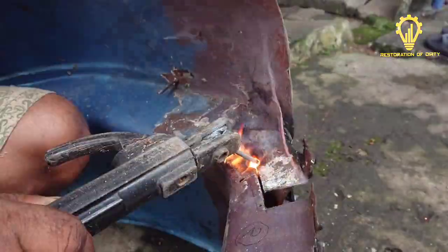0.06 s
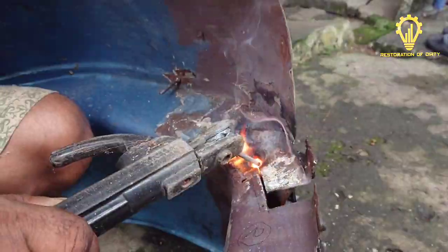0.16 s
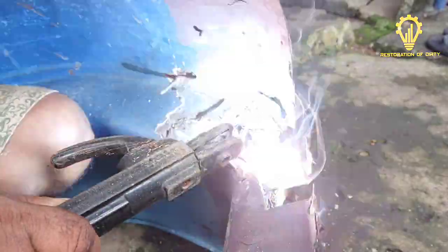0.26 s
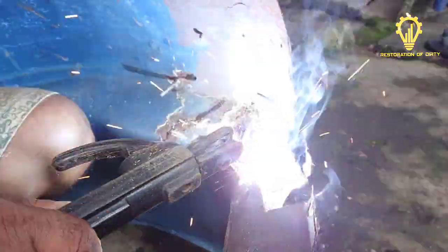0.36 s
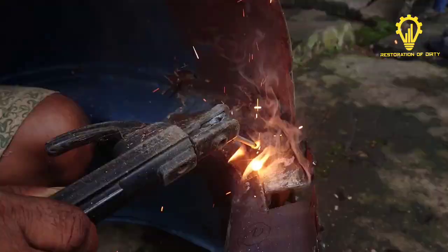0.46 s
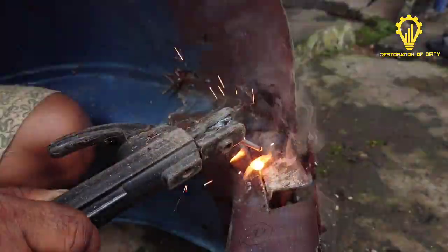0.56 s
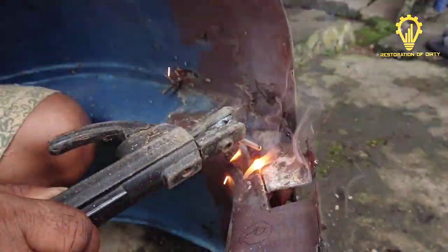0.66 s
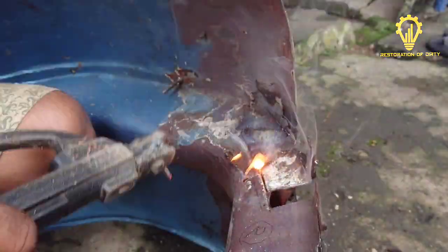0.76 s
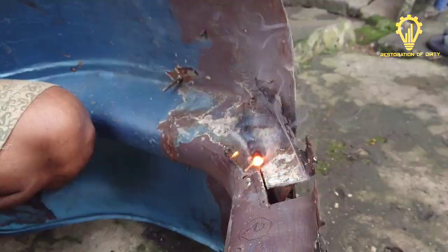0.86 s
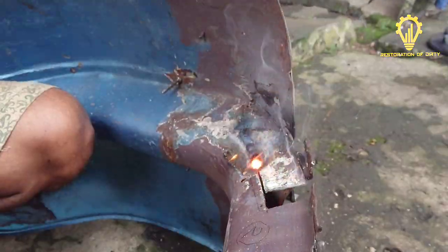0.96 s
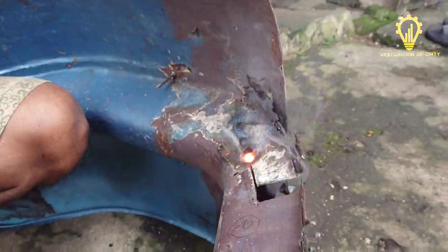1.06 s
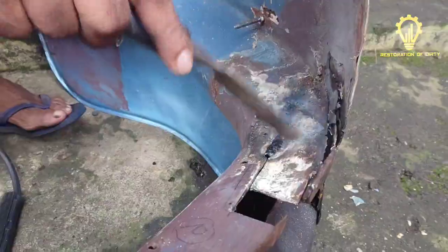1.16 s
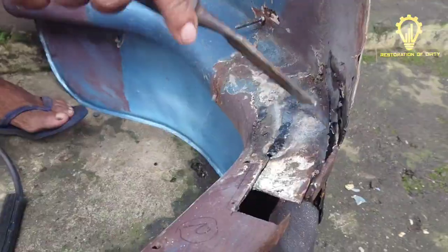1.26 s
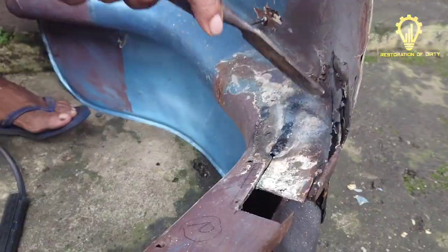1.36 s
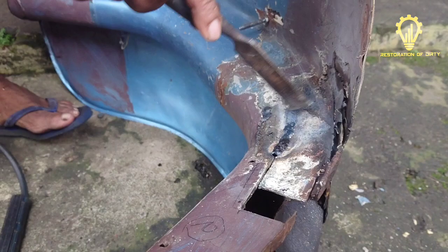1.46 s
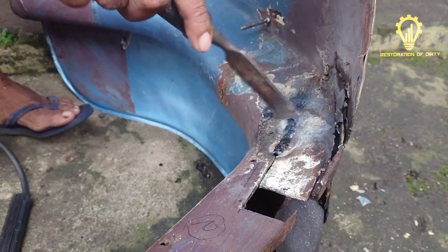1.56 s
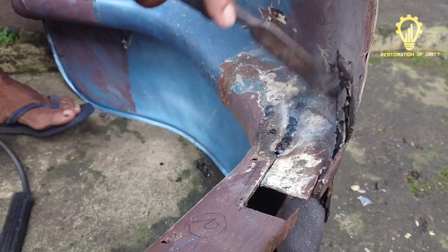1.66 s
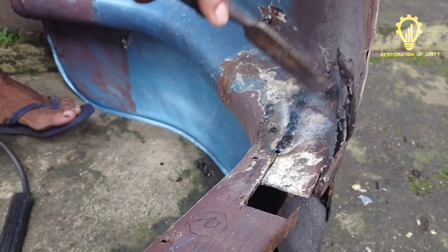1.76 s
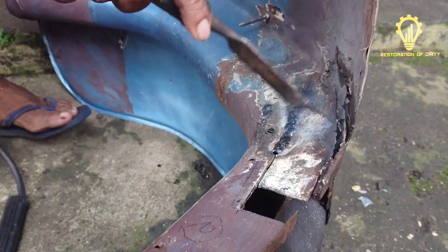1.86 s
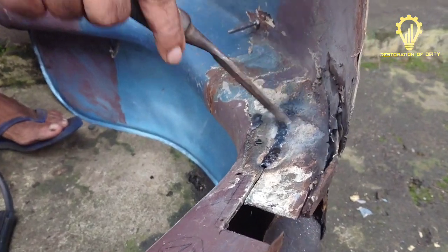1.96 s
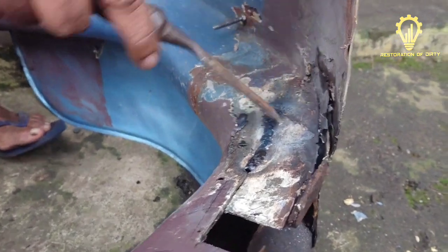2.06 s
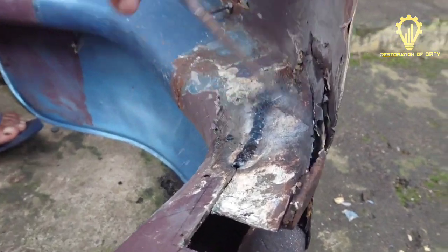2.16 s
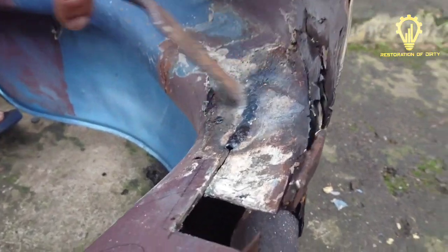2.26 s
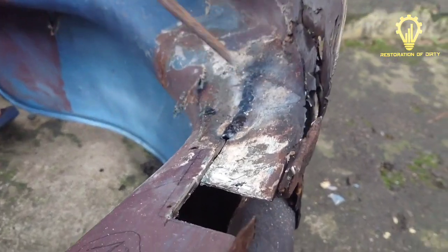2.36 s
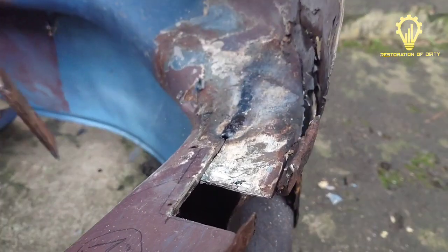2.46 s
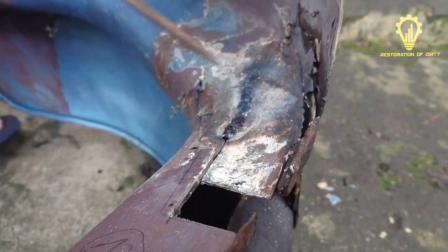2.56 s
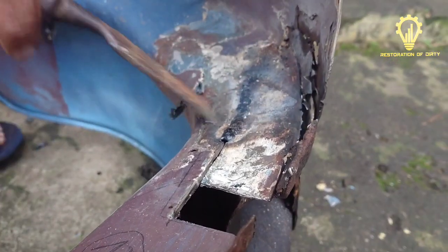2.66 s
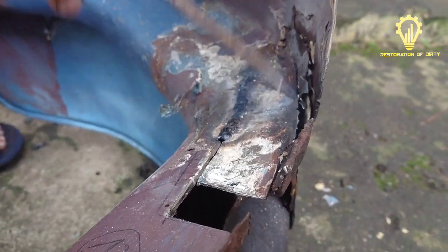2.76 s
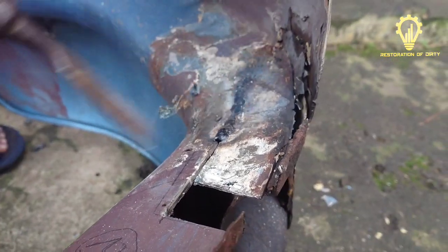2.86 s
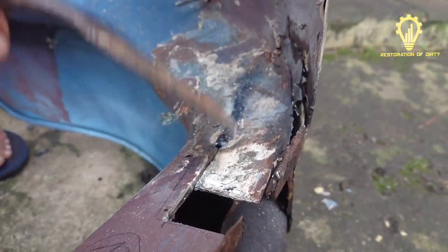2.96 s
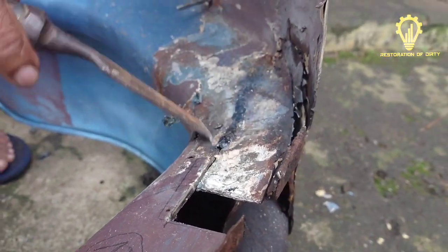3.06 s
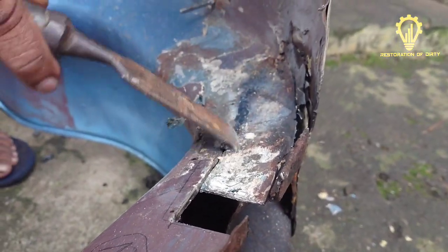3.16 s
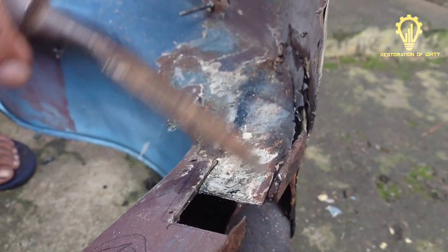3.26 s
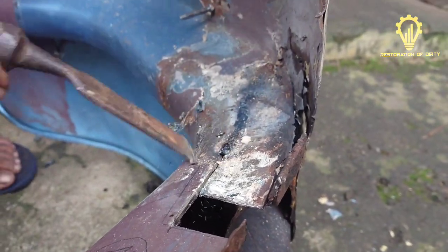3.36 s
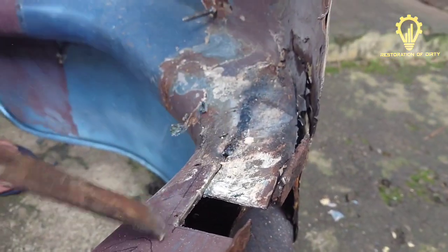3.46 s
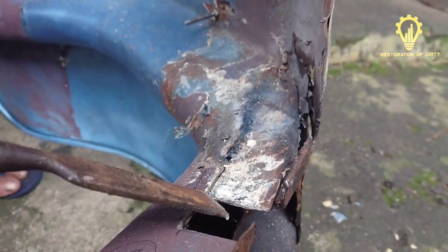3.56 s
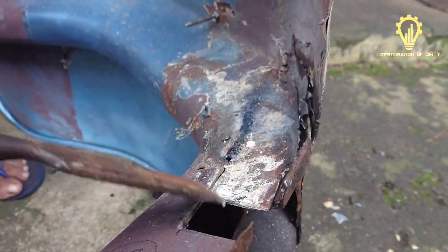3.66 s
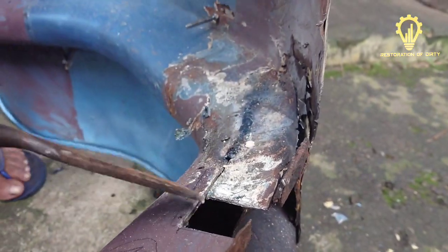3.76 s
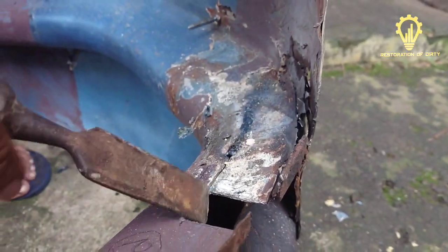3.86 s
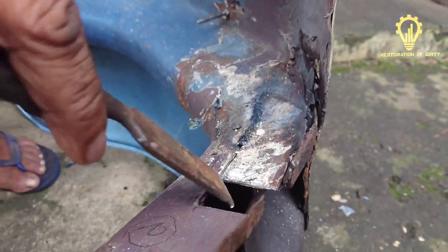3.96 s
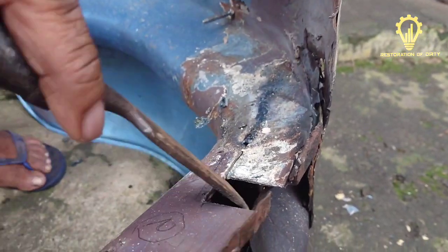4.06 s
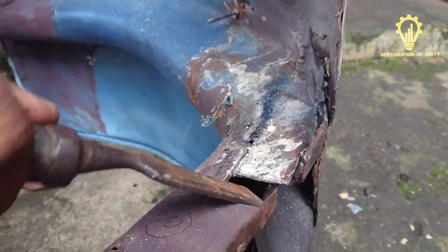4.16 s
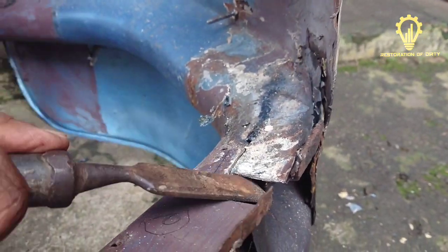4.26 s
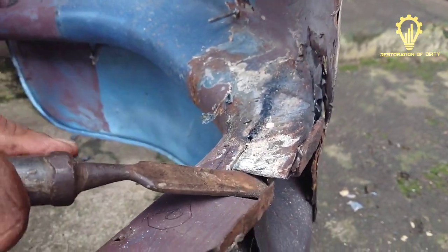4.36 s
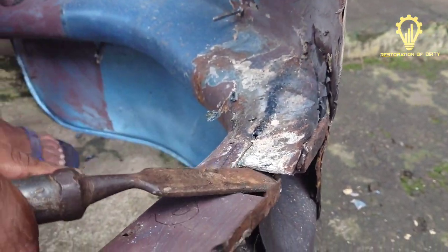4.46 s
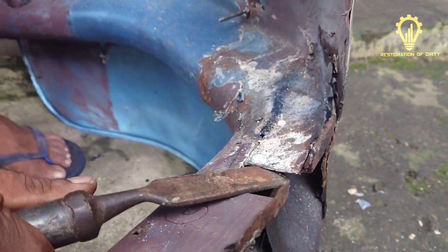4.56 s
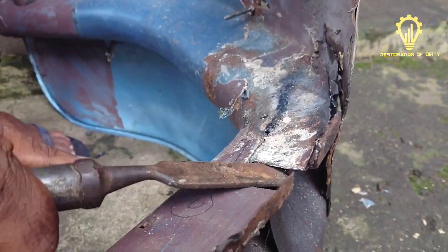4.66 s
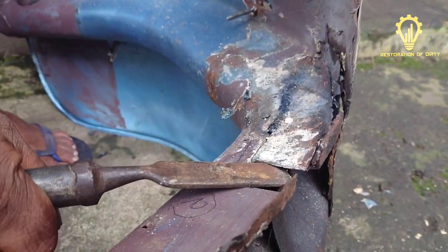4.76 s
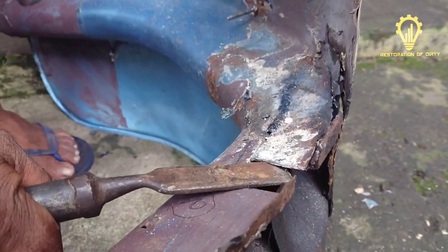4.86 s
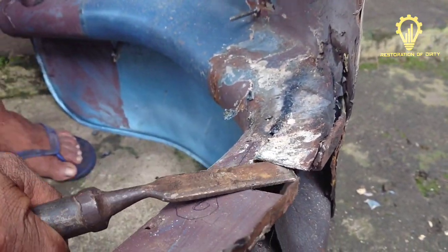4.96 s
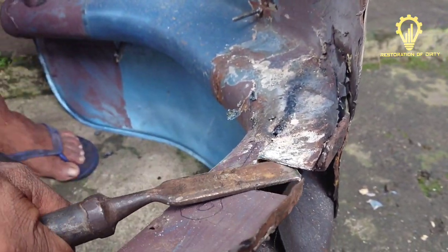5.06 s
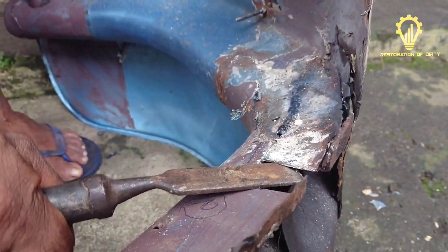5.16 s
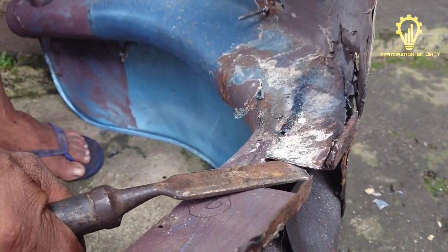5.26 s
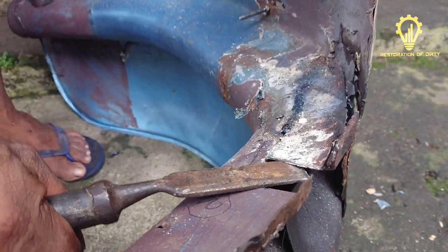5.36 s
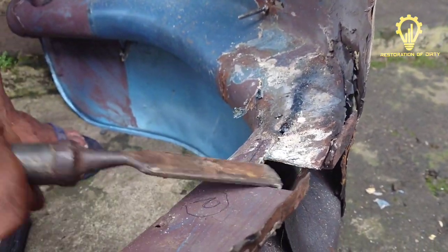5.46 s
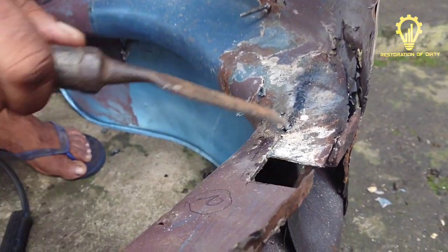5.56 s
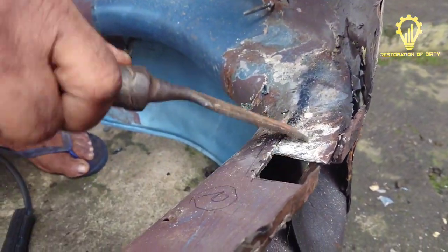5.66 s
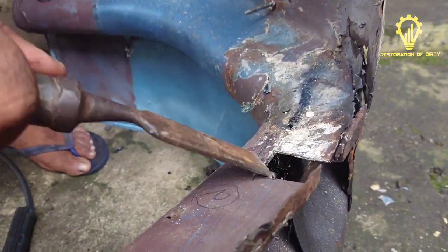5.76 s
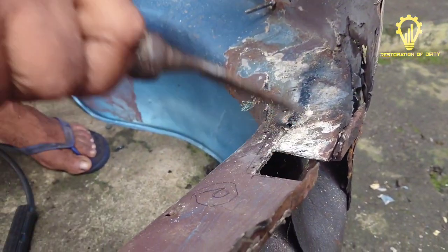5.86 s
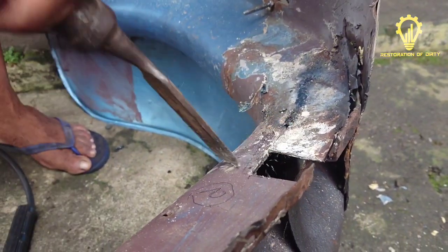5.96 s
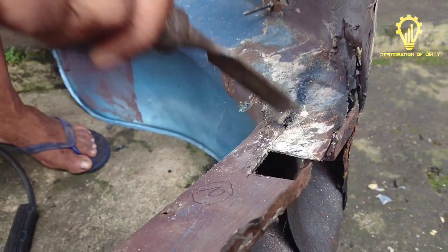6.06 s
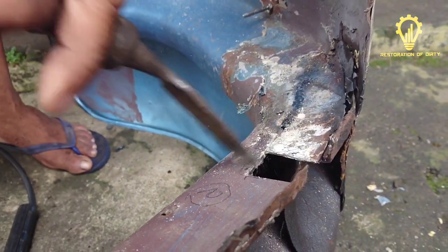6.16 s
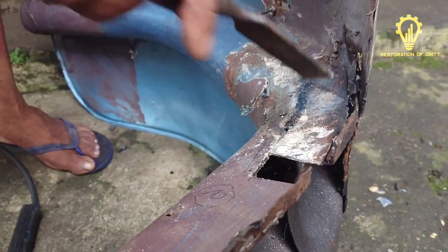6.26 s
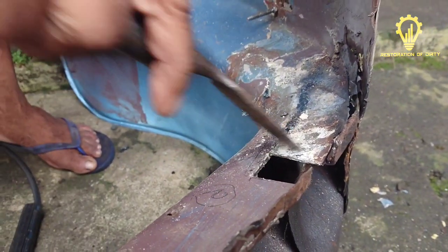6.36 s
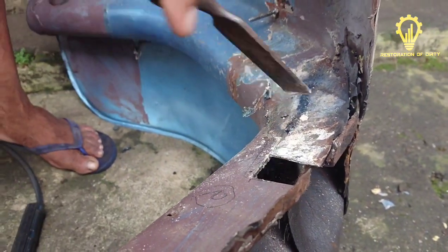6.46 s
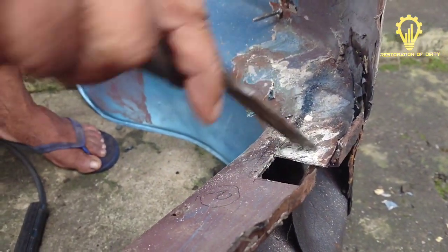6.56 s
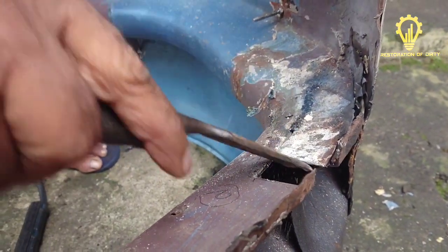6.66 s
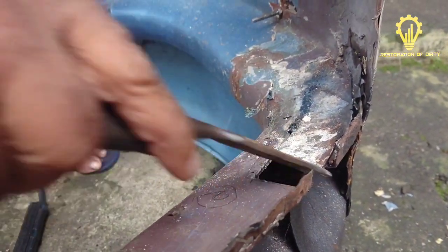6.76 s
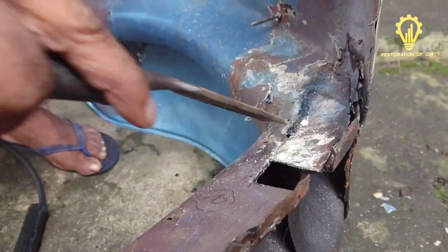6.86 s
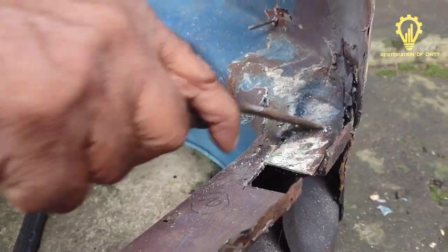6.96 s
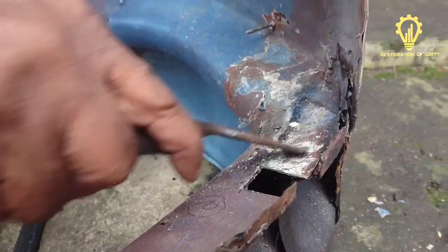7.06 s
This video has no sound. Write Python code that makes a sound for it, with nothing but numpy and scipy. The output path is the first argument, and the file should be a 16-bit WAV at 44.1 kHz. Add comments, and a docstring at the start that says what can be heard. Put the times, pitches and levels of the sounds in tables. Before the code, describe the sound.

Close outdoor metalwork in wide stereo: a quiet sizzle, a brief rasping arc burst leaning right, sizzle again and a momentary gap. Then rapid irregular chisel strikes on welded sheet steel, short and clanky with bright edges, some double hits, ticking slag flakes and gritty scrapes. Loose metal booms dully midway, the blows almost stop while a far motor swells, then heavy chipping and scraping resume to the end.

```python
"""Faint air and a sizzle of hot slag, then a stick welder spits one short crackling burst on a steel panel.
After a brief hush the open yard sets in, a motor droning far away, and a steel chisel chips the slag off.
The welding and the air are coloured noise with grains; the motor, panel and blade are sums of sines.
Knocks, rebounds and scrapes excite the panel, on the weld or on its rim; a limiter flattens the hardest blows."""
import sys
import numpy as np
from scipy import signal
from scipy.fft import rfft, irfft, next_fast_len
from scipy.io import wavfile
from scipy.ndimage import uniform_filter1d, minimum_filter1d, map_coordinates

SR = 44100
rng = np.random.default_rng(int(sys.argv[2]) if len(sys.argv) > 2 else 0)


def write(x):
    x = np.atleast_2d(x).T
    wavfile.write(sys.argv[1], SR, np.round(np.clip(x, -1, 1) * 32767).astype(np.int16))


N = 313992
TIME = np.arange(N) / SR


def amp(db):
    """Decibels to gain."""
    return 10 ** (np.asarray(db) / 20)


def unit(x):
    """Scale to rms 1."""
    return x / np.sqrt(np.mean(x ** 2) + 1e-20)


def along(points, hz):
    """(Hz, value) points read on a log axis."""
    f, v = np.transpose(points)
    return np.interp(np.log(hz + 1), np.log(f + 1), v)


def curve(rows, t=TIME):
    """(s, value) rows joined by straight lines."""
    return np.interp(t, *np.transpose(rows))


def wobble(rate):
    """A smooth random curve, rate knots a second."""
    knots = rng.standard_normal(int(N * rate / SR) + 4)
    return map_coordinates(knots, [TIME * rate])


def held(on, off, rise, fall):
    """Attack, hold and release in dB: 0 between on and off, with slopes in dB per second."""
    return -rise * np.maximum(on - TIME, 0) - fall * np.maximum(TIME - off, 0)


def filtered(x, response):
    """x times a response of frequency."""
    n = x.shape[-1]
    m = next_fast_len(n + 2048)
    return irfft(rfft(x, m) * response(np.fft.rfftfreq(m, 1 / SR)), m)[..., :n]


# left-right likeness: freq_hz, correlation (0-1)
ALIKE = [(100, 0.86), (600, 0.69), (1500, 0.25), (5000, 0.11), (12000, 0.53)]


def noise(colour, size=N):
    """Stereo noise of rms 1; the two sides agree most in the bass."""
    def mid_side(hz):
        turn = np.arccos(np.clip(along(ALIKE, hz), -1, 1)) / 2
        return colour(hz) * np.array([np.cos(turn), np.sin(turn)])

    mid, side = filtered(rng.standard_normal((2, size)), mid_side)
    return unit(np.array([mid + side, mid - side]))


def rush(spectrum):
    """Stereo noise with a (Hz, dB) spectrum."""
    return noise(lambda hz: amp(along(spectrum, hz)))


def grains(rate, spread_db, size=N):
    """Random tiny impulses, rate a second; with a spread, a few are much larger than the rest."""
    hits = rng.random(size) < rate / SR
    sign = rng.choice([-1, 1], size)
    return hits * sign * amp(spread_db * np.minimum(rng.exponential(size=size), 4))


def add(track, s, sound):
    """Mix a sound into the track at time s."""
    part = track[:, round(s * SR):][:, :sound.shape[1]]
    part += sound[:, :part.shape[1]]


# hot slag: time_s, level_db
SIZZLE = [(0, -64.5), (0.5, -67), (0.58, -64.5), (1.02, -64.5), (1.07, -59), (1.11, -60)]
# its spectrum: freq_hz, density_db (per Hz, relative)
SIZZLE_COLOUR = [(600, -25), (1300, 0), (3600, 7.5), (6500, 4.5), (11500, -5), (13700, -5), (16000, -5)]


def sizzle():
    """Hot slag sizzles as fluctuating noise with sparse ticks."""
    ticks = unit(filtered(grains(rate=60, spread_db=0), lambda hz: amp(along(SIZZLE_COLOUR, hz))))
    level_db = curve(SIZZLE) + 1.8 * wobble(48.9)
    return amp(level_db) * (rush(SIZZLE_COLOUR) + 0.16 * ticks)


# quiet yard while welding: freq_hz, density_db (per Hz, relative)
CALM = [(30, -32), (70, -28), (135, -5), (210, -8), (380, -9), (455, -0.5), (560, -14.5), (680, -11),
        (1240, -20.5), (3000, -32), (16000, -56)]


def calm_air():
    """Outdoor air while welding: slowly fluctuating coloured noise."""
    return amp(-58 + 1.4 * wobble(9.4)) * rush(CALM)


# slag flakes snapping off: time_s, level_db
FLAKES = [(0.119, -66), (0.719, -55.5), (0.753, -62.5), (0.946, -56.5), (1.367, -48), (1.785, -35),
          (2.371, -37)]


def flakes():
    """Brittle slag snaps with a thin tick: a short decaying burst of treble noise."""
    out, t = np.zeros((2, N)), np.arange(SR // 16) / SR
    colour = [(1200, -20), (3600, 7), (8000, 3), (14000, 0)]
    for s, db in FLAKES:
        snap = noise(lambda hz: amp(along(colour, hz)), size=len(t))
        add(out, s, amp(db - 60 * t / 0.053) * np.minimum(t / 0.0011, 1) * snap)
    return out


ARC_ON_S, ARC_OFF_S, ARC_DB = 0.2784, 0.447, -45  # steady burn, before the left/right gains
ARC_RISE_DB_PER_S, ARC_FALL_DB_PER_S = 1200, 650
FLARE_DB, FLARE_S = 9.5, 0.016
SPIT_S = .004
# molten drops spit: time_s, level_db (over the burn)
SPITS = [(.325, 7), (.383, 6)]


def arc_level():
    """In dB: the arc strikes with a flare, burns steadily apart from a few spits, and breaks off."""
    flare = FLARE_DB * np.exp(-np.maximum(TIME - ARC_ON_S, 0) / FLARE_S)
    spits = sum(db * np.exp(-((TIME - s) / SPIT_S) ** 2) for s, db in SPITS)
    return ARC_DB + held(ARC_ON_S, ARC_OFF_S, ARC_RISE_DB_PER_S, ARC_FALL_DB_PER_S) + flare + spits


# arc spectrum: freq_hz, density_db (per Hz, relative)
ARC_COLOUR = [(59, -52), (100, -20), (174, -2), (424, -11.5), (452, -20), (513, -13), (634, -17),
              (1030, -12), (2170, -9.5), (3540, -11.5), (10900, -6.5), (14400, -12), (16000, -30)]


def arc():
    """The arc spatters in dense sputtering pops over a rush of noise, louder on the right."""
    pops = unit(filtered(grains(rate=1500, spread_db=3), lambda hz: amp(along(ARC_COLOUR, hz))))
    sputter_db = 2.3 * wobble(450) + 2 * wobble(140)
    burn = amp(arc_level() + sputter_db) * unit(rush(ARC_COLOUR) + 0.35 * pops)
    return burn * amp([[-3.5], [4]])


HUM_HZ, HUM_DB, HUM_SWELL_DB_PER_S, HUM_FALL_DB_PER_S = 210, -49, 114, 260


def sheet_hum():
    """The heated sheet hums in its low mode, strongest as the arc dies."""
    hum_db = HUM_DB + held(ARC_OFF_S, ARC_OFF_S, HUM_SWELL_DB_PER_S, HUM_FALL_DB_PER_S)
    return amp(hum_db + wobble(32)) * np.sqrt(2) * np.sin(2 * np.pi * HUM_HZ * TIME)


PAUSE_S = 1.117


def welding():
    """Arc, humming sheet, sizzling slag and air, faded out together at the pause."""
    fade_out = np.clip((PAUSE_S - TIME) / 0.0056, 0, 1)
    return (arc() + sheet_hum() + sizzle() + calm_air()) * fade_out


RESUME_S, YARD_DB = 1.17, -45
MOTOR_IDLE_DB, MOTOR_LOAD_DB = -21, -1.5  # gains on the MOTOR levels
LOAD_ON_S, LOAD_OFF_S, MOTOR_DB_PER_S = 4.4, 5.13, 63
# yard while chipping: freq_hz, density_db (per Hz, relative)
YARD = [(15, -49), (25, -20), (66, -9.5), (185, -5.5), (236, 0), (317, -13.5), (695, -14), (936, -19),
        (1700, -20.5), (2550, -19.5), (3720, -28), (6740, -31), (7710, -37), (14000, -43.5), (16000, -35)]
# motor partials: mean_pitch_hz, level_db (before the idle/load gain)
MOTOR = [(75.4, -51.5), (226.1, -56), (511.4, -62), (780.6, -85), (1055, -77)]


def motor():
    """A distant motor drones: partials of one unsteady shaft, swelling for a moment."""
    shaft = np.cumsum(1 + 0.055 * wobble(17)) / SR
    drone = 0
    for hz, db in MOTOR:
        drone = drone + amp(db + 1.3 * wobble(3)) * np.sqrt(2) * np.sin(2 * np.pi * hz * shaft)
    load_db = MOTOR_LOAD_DB + held(LOAD_ON_S, LOAD_OFF_S, MOTOR_DB_PER_S, MOTOR_DB_PER_S)
    return amp(np.maximum(MOTOR_IDLE_DB, load_db)) * drone


def yard():
    """Outdoor air as coloured noise, with the distant motor, opening quickly after the pause."""
    opening = amp(held(RESUME_S, N / SR, rise=1900, fall=0))
    air = amp(YARD_DB + 1.44 * wobble(6)) * rush(YARD)
    return opening * (air + motor())


RIM_LEAN_DB, RIM_LEAD_S = -2, .00011  # at the rim: L-R change, left side earlier by
# where the chisel works: time_s, place (0 weld, 1 rim)
PLACE = [(2.0, 0.041), (2.9, 0.38), (3.03, 0.84), (3.18, .25), (3.31, 0.81), (4.1, 0.67), (5.7, 0.85),
         (6.2, 0.79), (6.3, 0.26), (7.1, 0.55)]


def placed(sound, s):
    """The spot being worked sets the level and the arrival time at the two microphones."""
    side = curve(PLACE, s) * np.array([[.5], [-.5]])
    return filtered(sound, lambda hz: amp(side * RIM_LEAN_DB) * np.exp(2j * np.pi * hz * side * RIM_LEAD_S))


# overlapping modes: centre_hz, clash_db, clash_t60_s, ring_db (relative to the clash), ring_t60_s
CROWD = [(123, -23, 0.033, 6.5, 0.14), (341, -13, 0.075, -4, 0.24), (725, -8.5, 0.09, -8.5, 0.23),
         (1460, -4.5, 0.049, -12, 0.2), (2970, -9, 0.032, -6.5, 0.14), (5380, -3, 0.012, -12.5, 0.16),
         (7800, -8, 0.03, -11.5, 0.14), (11800, -7.5, 0.012, -9, 0.12)]


def crowd_bands(ripple_db):
    """Overlapping modes merge into bands of noise, one per row of CROWD; they bunch unevenly in the treble."""
    centres = [row[0] for row in CROWD]
    bunching = rng.standard_normal(SR // 64)

    def ripple(hz):
        bumps = map_coordinates(bunching, [hz / 110], mode="mirror")
        return amp(ripple_db * np.minimum(hz / 2500, 1) * bumps)

    def band(centre):
        share = [(c, c == centre) for c in centres]
        bass_cut = lambda hz: (hz ** 2 / (hz ** 2 + 75 ** 2)) ** 2
        return noise(lambda hz: np.sqrt(along(share, hz)) * ripple(hz) * bass_cut(hz), size=2 * SR)

    return np.array([band(centre) for centre in centres])


# panel modes: nominal_pitch_hz, weld_db, rim_db (struck there; mean, relative), t60_s
PANEL = [(205.4, -18, -20, 0.26), (279.6, -17, -17.5, 0.27), (309.3, -18.5, -16.5, 0.2),
         (362.4, -15.5, -16.5, 0.15), (460, -14.5, -17.5, 0.06), (513.4, -20.5, -28.5, 0.2),
         (633.3, -13.5, -8, 0.052), (781, -7, -24, 0.08), (849, -16.5, -23, 0.11),
         (946.4, -28.5, 8.5, 0.084), (986, -22, 9.5, 0.051), (1070, 2.5, -21, 0.032),
         (1160, -0.5, 0.5, 0.047), (1490, -1.5, -2, 0.043), (1582, -11, -11, 0.11), (1663, 1, -20, 0.04),
         (1960, -5.5, -13, 0.063), (2285, 0.5, -51, 0.029), (2490, -10, -31, 0.061), (2903, -1, -15, 0.024),
         (3035, -1, -55, 0.042), (4200, -14, -4, 0.058), (4634, -1, 4, 0.018), (5070, -39, -16, 0.059),
         (5970, -4, -27, 0.038), (6510, -7.5, -11.5, 0.059), (9800, -36, -35, 0.061),
         (13400, -9.5, -20, 0.056), (12500, -23, -23, 0.044)]


def panel(bands, s, thud_db, treble_db, crush, own_modes, modes_db):
    """The panel's answer to one contact: a clash while slag is crushed, then a short ring."""
    t = np.arange(SR // 3, dtype=np.float32) / SR
    rim = float(np.clip(curve(PLACE, s), 0, 1))
    tilt = lambda hz: amp(along([(300, thud_db), (800, 0), (1800, 0), (6000, treble_db)], hz))
    fade = lambda age, t60: np.exp(age * float(-np.log(1000) / t60))
    # bending waves are slow in the bass, so low modes swell later; a dull contact is also a slow one
    contact_s = .0022 + .0015 * rim + .00025 * max(-treble_db - 5, 0)
    swell = lambda hz: 1 - np.exp(-(t / float(contact_s + 0.59 / hz)) ** 1.18)
    out = np.zeros((2, len(t)))
    for band, (hz, db, clash_t60, ring_db, ring_t60) in zip(bands, CROWD):
        clash = fade(np.maximum(t - crush, 0), clash_t60)
        life = np.hypot(clash, amp(ring_db) * fade(t, ring_t60))
        start = rng.integers(SR)
        out += amp(db) * tilt(hz) * swell(hz) * life * band[:, start:start + len(t)]
    ring = np.zeros_like(t)
    modes = [(hz, weld + rim * (edge - weld), t60) for hz, weld, edge, t60 in PANEL]
    for hz, db, t60 in modes + own_modes:
        # every spot excites the modes differently, and the pressing tool detunes them
        size, detune, phase = rng.standard_normal(3).tolist()
        pitch_hz = float(hz + detune * min(.011 * hz, 38))
        wave = np.sin(2 * np.pi * (pitch_hz * t + phase))
        ring += float(amp(db + modes_db + 4.1 * size) * tilt(hz)) * fade(t, t60) * swell(hz) * wave
    out += ring
    return out / np.sqrt(np.mean(out[:, :SR // 64] ** 2))  # rms 1 at the onset


# thud: full blow on the weld; more on the loose rim; more per dB that the contact is lighter
THUD_DB, RIM_THUD_DB, LIGHT_THUD_DB_PER_DB, FULL_BLOW_DB = -3.5, 6, 0.22, -9
SPOT_DB, SPOT_T60_S = 5, 0.053  # struck spot, mean level relative to PANEL
FLEX_HZ, FLEX_SCATTER, FLEX_DB, FLEX_T60_S = 385, 0.1005, -16.5, .15  # sheet around it, median pitch


def contact(bands, s, db, treble_db, spot_hz, crush):
    """One touch rings the struck spot and flexes the sheet; light touches and the loose rim thud more."""
    thud_db = THUD_DB + RIM_THUD_DB * curve(PLACE, s) + LIGHT_THUD_DB_PER_DB * (FULL_BLOW_DB - db)
    flex_hz = FLEX_HZ * np.exp(FLEX_SCATTER * rng.standard_normal())
    own_modes = [(spot_hz, SPOT_DB, SPOT_T60_S), (flex_hz, FLEX_DB, FLEX_T60_S)]
    answer = panel(bands, s, thud_db, treble_db, crush, own_modes, modes_db=1.66)
    return amp(db) * placed(answer, s)


CRUSH_S, REBOUND_CRUSH_S = 0.0086, .011  # slag crushing; a rebound is looser
REBOUND_TREBLE_DB = 3.5  # a rebound meets bared metal and is brighter
PUSH_DB, PUSH_THUD_DB, PUSH_TREBLE_DB = -5, 21, -16  # soft contact, level relative to its boom
# strokes: time_s, level_db, treble_db, nominal_spot_pitch_hz, rebounds [(delay_s, drop_db)]
STROKES = [(1.214, -18, -6, 1575, [(.02, 11.5)]), (1.422, -6, -5, 1160, []),
           (1.565, -6.5, -9, 1131, [(.031, 15.5)]), (1.703, -8, 1, 1072, []), (1.839, -8.5, -8, 1153, []),
           (1.957, -5, -3.5, 1070, [(.036, 17)]), (2.088, -10, -5.5, 1130, [(.034, 4)]),
           (2.217, -8, -16.5, 1248, [(.043, 6.5), (.059, 3.5)]), (2.423, -9, -6, 1130, [(.045, 23)]),
           (2.634, -8.5, -14.5, 1563, [(.042, 10.5)]), (2.698, -14, -4.5, 1182, []),
           (2.816, -8, -6, 1760, [(.046, 6.5)]), (3.022, -8.5, -8, 997, [(.028, -0.5), (.053, 23)]),
           (3.183, -20.5, -16.5, 1525, [(.03, -0.5)]), (3.306, -5, 3, 910, []),
           (3.487, -15, -22.5, 967, []), (3.564, -7, -13.5, 983, []), (3.906, -18, -11, 1018, []),
           (4.127, -21.5, -20, 1030, []), (4.257, -39, -12, 1160, []), (4.693, -33, -16, 781, []),
           (5.209, -27.5, -15, 764, []), (5.509, -18, -10, 980, []), (5.761, -7.5, -14, 902, []),
           (5.902, -5, -4, 1497, []), (5.977, -16.5, -17.5, 1060, []), (6.105, -17, -1.5, 1550, []),
           (6.115, -8, -10, 926, [(.066, 8)]), (6.326, -7, -9, 1230, []),
           (6.532, -10.5, -9.5, 1230, [(.054, 16.5)]), (6.668, -26.5, -19, 1380, []),
           (6.717, -20, -13, 1163, []), (6.925, -9, 1, 908, [(.009, 5)]),
           (6.996, -15, -22.5, 1490, [(.068, 2)])]
# loose sheet bulging under the tool: time_s, level_db, pitch_hz
BOOMS = [(3.588, -16.5, 138), (3.834, -23.5, 167), (4.068, -19.5, 162), (5.672, -19, 283)]


def knocks(bands):
    """Each stroke lands and may rebound on the same spot; a soft push starts each boom."""
    out = np.zeros((2, N))
    for s, db, treble_db, spot_hz, rebounds in STROKES:
        add(out, s - .001, contact(bands, s, db, treble_db, spot_hz, CRUSH_S))
        for later, drop_db in rebounds:
            bright_db = treble_db + REBOUND_TREBLE_DB
            add(out, s + later, contact(bands, s, db - drop_db, bright_db, spot_hz, REBOUND_CRUSH_S))
    for s, db, hz in BOOMS:
        push = panel(bands, s, PUSH_THUD_DB, PUSH_TREBLE_DB, CRUSH_S, [], modes_db=1.0)
        add(out, s, amp(db + PUSH_DB) * placed(push, s))
    return out


def struck(s, db, modes, rise):
    """A few (Hz, dB, t60) modes set ringing at time s."""
    out, t = np.zeros((2, N)), np.arange(SR // 3) / SR
    ring = 0
    for hz, level_db, t60 in modes:
        ring = ring + amp(level_db - 60 * t / t60) * np.sin(2 * np.pi * (hz * t + rng.random()))
    add(out, s, amp(db) * (1 - np.exp(-t / rise)) * ring[None])
    return out


# chisel blade modes: pitch_hz, level_db (relative), t60_s
BLADE = [(6660, -12, .07), (8900, -7, .045), (11160, -12, .045), (12800, 0, .035), (14250, -9, .035)]
# square blows: time_s, level_db
ZINGS = [(1.566, -15), (2.635, -25), (5.903, -16), (6.328, -6)]


def blade_zings():
    """A square blow makes the chisel's blade zing in its own high modes."""
    return sum(struck(s, db, BLADE, rise=0.0011) for s, db in ZINGS)


# dragged edge: start_s, end_s, level_db, thud_db, treble_db
SCRAPES = [(2.101, 2.134, -25, -2, 7), (2.232, 2.318, -24, 1, 2.5), (3.155, 3.231, -25, 4, -6.5),
           (3.503, 3.607, -34.5, -4, 11), (3.859, 3.912, -26, -5, -12), (4.059, 4.194, -33, 12.5, -11.5),
           (4.198, 4.39, -47, 7, -8.5), (5.436, 5.513, -37.5, 5, -2), (5.709, 5.807, -27, 4.5, -1),
           (5.907, 5.984, -36, 4, -5), (6.15, 6.2, -30, -24, 3), (6.356, 6.425, -24.5, 13.5, -8.5),
           (6.562, 6.76, -34, 1, -12.5), (6.719, 6.819, -25.5, -3, -11.5), (6.961, 7.12, -24, 5, -10.5)]


def scrapes(bands):
    """The dragged edge catches on rough metal; every slip is a tiny blow, and the ring changes as it moves on."""
    out = np.zeros((2, N))
    step = SR // 25
    for start, end, db, thud_db, treble_db in SCRAPES:
        size = max(round((end - start) * SR), step // 2)
        clumps = amp(3 * map_coordinates(rng.standard_normal(size // 200 + 4), [np.arange(size) / 200]))
        slips = grains(rate=900, spread_db=3.0, size=size) * clumps * signal.windows.tukey(size, .4)
        slips *= np.sqrt(2 * size / (np.sum(slips ** 2) + 1e-20))
        for i in range(0, size, step):
            own_modes = [(rng.uniform(948, 2220), 2, .05), (rng.uniform(280, 446), -8, .12)]
            answer = panel(bands, start, thud_db, treble_db, 0.0072, own_modes, modes_db=0)
            kernel = placed(answer, start) / np.linalg.norm(answer)
            drag = signal.fftconvolve(slips[None, i:i + step], kernel, axes=1)
            add(out, start + i / SR, amp(db) * drag)
    return out


# stereo level: freq_hz, left_minus_right_db
LEAN = [(60, -5), (110, 4), (200, 0), (380, -3), (700, 1), (1290, -5.0), (2380, -6.5), (4400, -5),
        (8120, -2.5), (15000, 2.5)]
# stereo phase: freq_hz, left_minus_right_rad
STEREO_PHASE = [(100, 0.043), (600, 0.23), (1100, 0.025), (1900, 1.48), (4000, 1.13), (8000, -2.36),
                (14000, -0.54)]


def chisel():
    """The chisel's sounds reach left and right with level and phase that differ, in ways that change with
    frequency."""
    bands = crowd_bands(ripple_db=3.0)
    side = np.array([[.5], [-.5]])
    width = lambda hz: amp(side * along(LEAN, hz)) * np.exp(1j * side * along(STEREO_PHASE, hz))
    return filtered(knocks(bands) + scrapes(bands), width)


def sheet_booms():
    """The loose sheet bulges under the tool with a dull boom, one decaying low mode."""
    return sum(struck(s, db, [(hz, 0, .2)], rise=0.0061) for s, db, hz in BOOMS)


def scene():
    """Welding first, then chipping in the open yard."""
    return welding() + flakes() + yard() + chisel() + blade_zings() + sheet_booms()


def limiter(x, ceiling_db, size):
    """Turn the gain down around peaks above the ceiling."""
    needed = np.minimum(1, amp(ceiling_db) / (np.abs(x).max(0) + 1e-9))
    return x * uniform_filter1d(minimum_filter1d(needed, size), size)


TOP_HZ = 15900
# microphone response: freq_hz, gain_db
MICROPHONE = [(6900, -1.5), (8100, -5), (9000, 1), (14300, 4.5), (15900, -2.5)]


def record(dry):
    """The camera limits the peaks, colours the treble and keeps nothing above its band limit."""
    limited = limiter(dry, ceiling_db=-.2, size=120)
    return filtered(limited, lambda hz: amp(along(MICROPHONE, hz)) * (hz < TOP_HZ))


dry = scene()
out = record(dry)
write(out)
```